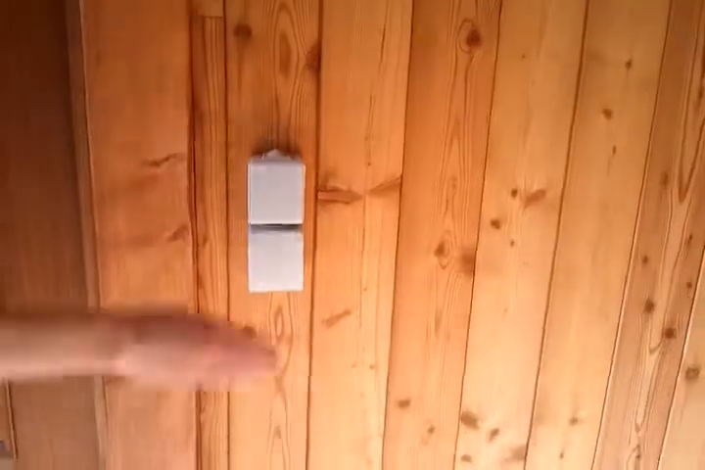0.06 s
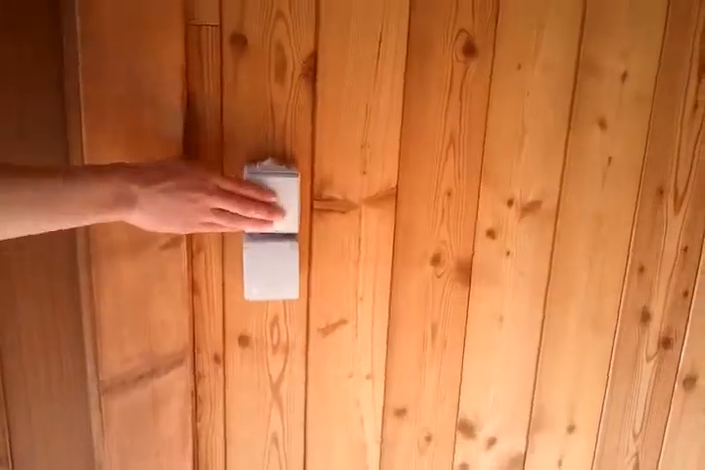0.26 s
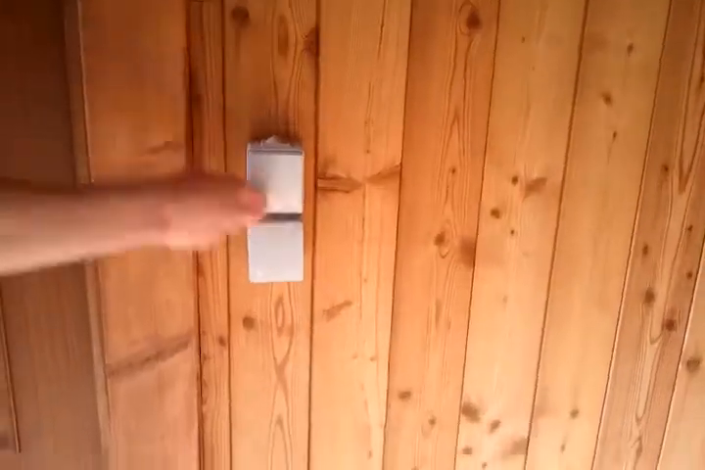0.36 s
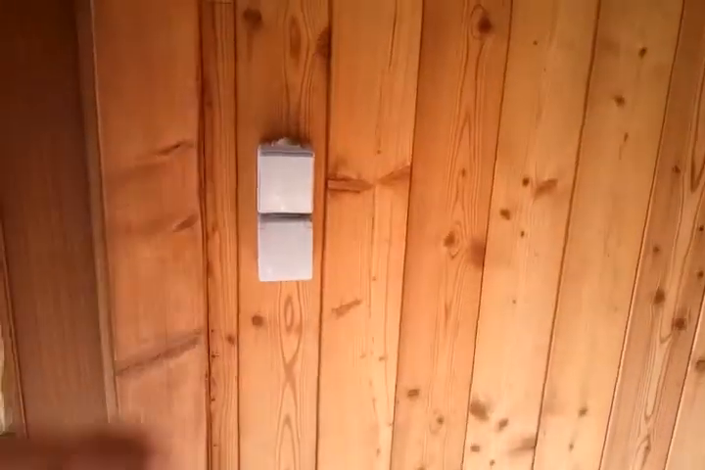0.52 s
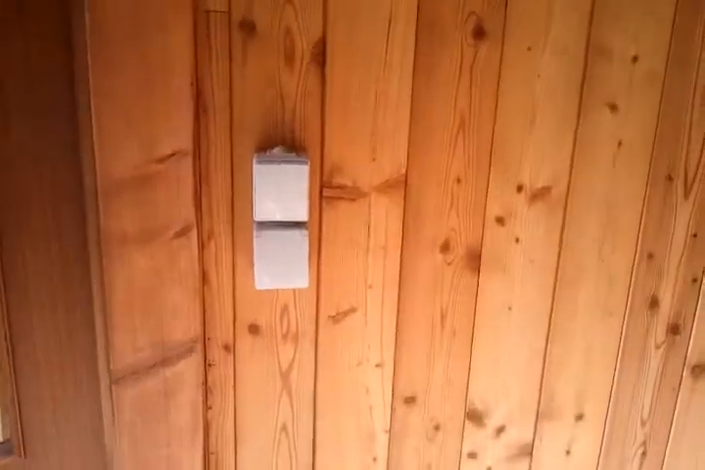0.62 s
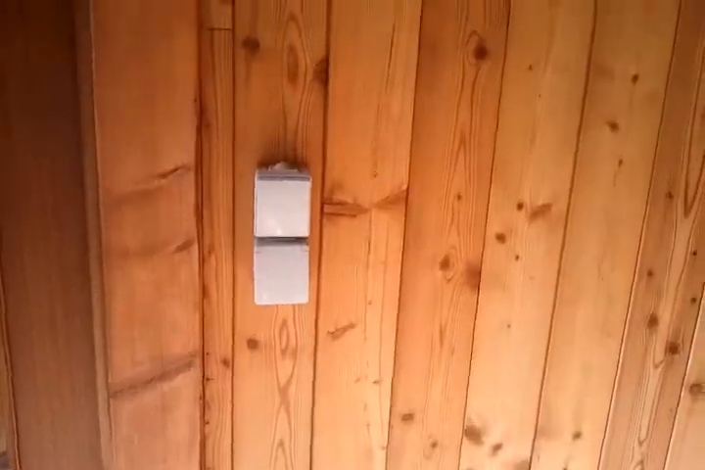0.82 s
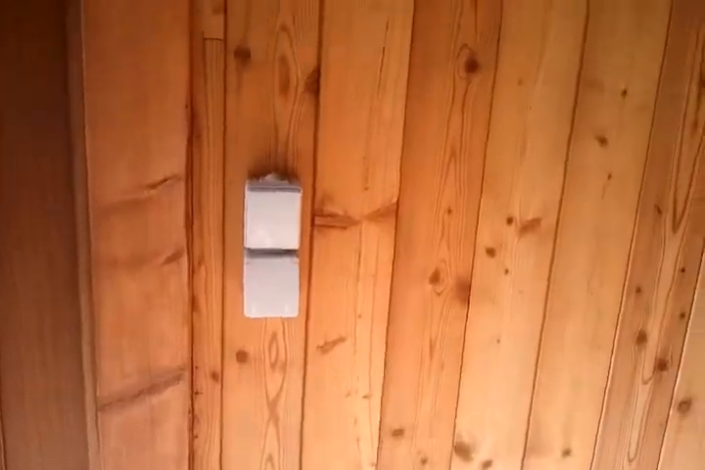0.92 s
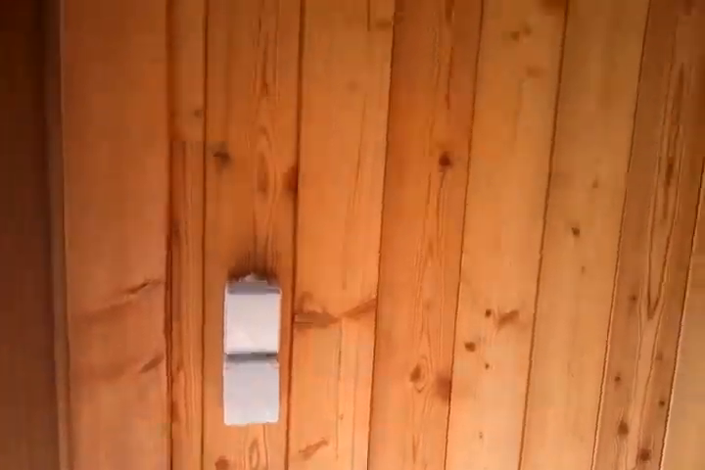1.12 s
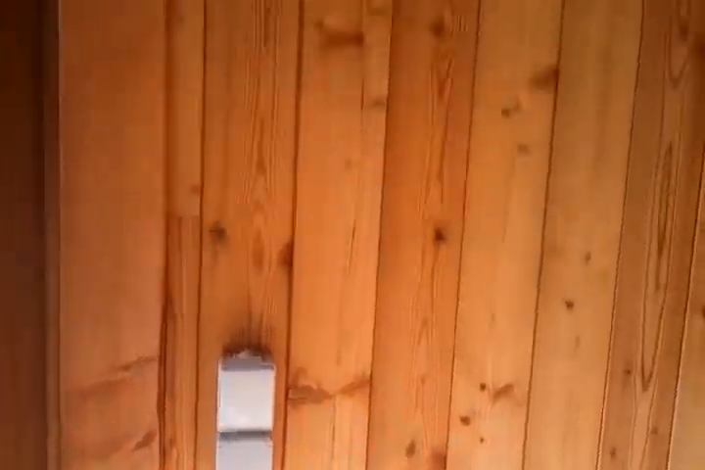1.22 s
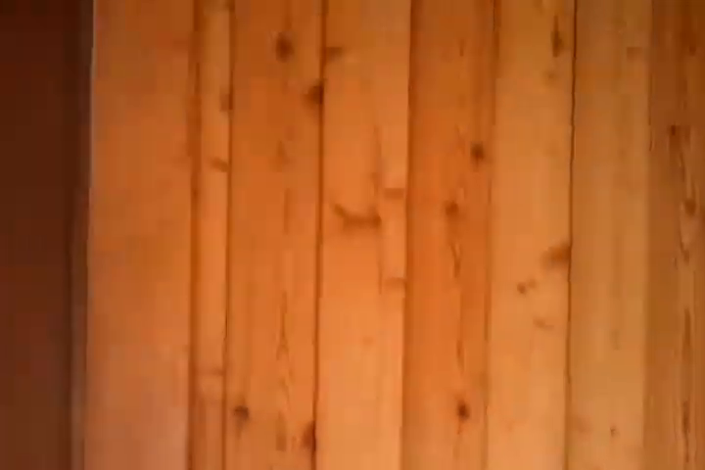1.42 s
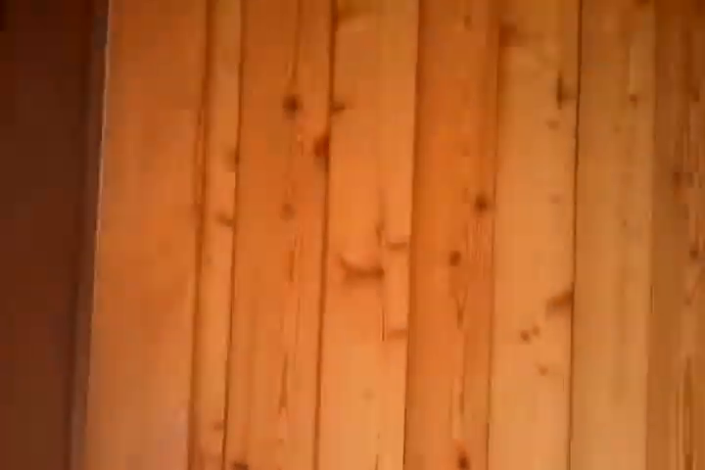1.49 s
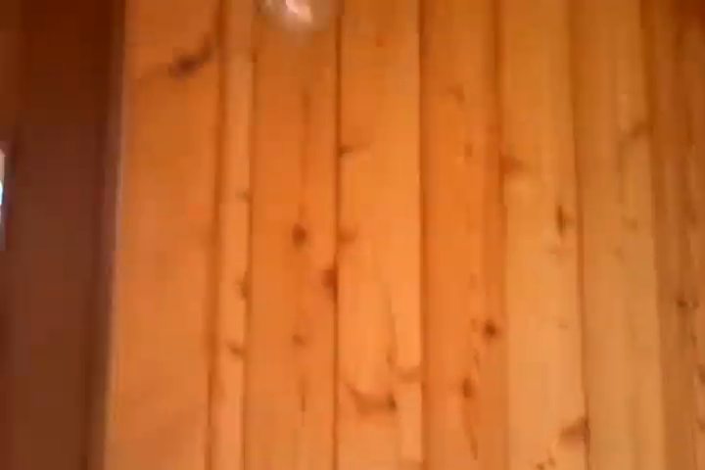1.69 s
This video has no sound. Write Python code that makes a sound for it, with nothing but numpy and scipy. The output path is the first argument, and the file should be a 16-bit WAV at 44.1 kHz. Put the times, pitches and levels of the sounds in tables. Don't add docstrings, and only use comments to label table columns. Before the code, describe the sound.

A plastic rocker switch on a wooden wall snaps once, loud and close, with a tiny rattle and short room reflection; afterwards soft cloth rustles and handling bumps, with faint birds outside, on a hand-held phone.

```python
import sys
import numpy as np
from scipy import signal
from scipy.fft import rfft, irfft, next_fast_len
from scipy.io import wavfile
from scipy.ndimage import uniform_filter1d, map_coordinates

SR = 44100
rng = np.random.default_rng(int(sys.argv[2]) if len(sys.argv) > 2 else 0)


def digitize_waveform(pressure):
    field = np.atleast_2d(pressure).T
    bounded = np.clip(field, -1, 1)
    quanta = np.round(bounded * 32767).astype(np.int16)
    wavfile.write(sys.argv[1], SR, quanta)


def nominal_scale(level):
    x = np.asarray(level, float) / 20
    return 10 ** x


N = 77175

# (frequency [Hz], level [dB])
AIR_COLOUR = [(76, -31), (130, -15), (250, -10), (858, -15.5), (1590, -17.5), (3520, -10), (4550, -14.5),
              (12500, -25.5), (15000, -21.5)]
# (frequency [Hz], level [dB rms])
HUM_TONES = [(50, -60), (100, -63), (305, -79)]
# (frequency [Hz], level [dB])
RUMBLE_COLOUR = [(8.8, 0), (15, 5), (56, -4), (183, -21), (321, -38), (400, -24.5), (520, -54), (880, -120)]
# (time [s], level [dB])
RUMBLE_LEVEL = [(0, -63.5), (.15, -54.5), (.232, -35), (.33, -41), (.5, -49.5), (.55, -48.5), (.62, -60.5),
                (.66, -48.5), (.83, -50), (.86, -58.5), (1.1, -56.5), (1.16, -57), (1.75, -57)]
# (time [s], attack [s], hold [s], release t60 [s], level [dB])
GRIP_SHIFTS = [
    (.42, .015, .02, .06, -60),
    (.525, .01, .012, .04, -51),
    (.67, .02, .07, .1, -53),
    (.78, .008, .03, .08, -51),
    (1.15, .01, .02, .08, -56),
]
# (frequency [Hz], level [dB])
GRIP_COLOUR = [(40, -10.5), (90, 9.5), (200, -7.5), (350, -10.5), (700, -21), (1500, -120)]
# (time [s], level [dB], width [s], sign [-1 to 1])
CASE_CREAKS = [
    (0.1857, -19, 0.00019, -0.76),
    (0.31, -22, 0.0027, 0.95),
    (0.363, -28, 0.000067, 0.46),
    (0.542, -30, 0.0041, 0.46),
    (1.512, -40, 0.000044, 1),
    (1.6644, -21.5, 0.0001, 0.74),
]

# (frequency [Hz], width [Hz], level [dB])
FLOCK_PEAKS = [(2696, 820, 0.5), (3300, 1600, -13.5), (4880, 310, -2.5), (6900, 560, -4.5),
               (7400, 1500, -10.5)]
# (time [s], level [dB])
FLOCK_LEVEL = [(0, -68), (.3, -67), (.62, -64.5), (.9, -60), (1.2, -65), (1.35, -56), (1.6, -63.5),
               (1.75, -66)]
# (time [s], length [s], start [Hz], end [Hz])
RISING_WHISTLES = [(.012, .066, 3200, 5250), (.024, .06, 3100, 4750), (.036, .05, 3000, 4200),
                   (.646, .09, 4550, 5300), (.632, .105, 4550, 5600), (.895, .04, 2450, 2800),
                   (1.52, .05, 5200, 5600), (1.575, .03, 5550, 5600)]
RISING_DB = [-59, -60, -60.5, -58, -48.5, -58.5, -59.5, -63]
# (time [s], length [s], start [Hz], end [Hz])
UPWARD_SWEEPS = [(.115, .025, 2600, 3300), (.33, .05, 2600, 3400), (.46, .032, 2800, 4000),
                 (.515, .02, 3500, 6500), (.565, .034, 2800, 4000), (.975, .078, 3150, 4450),
                 (1.48, .065, 2900, 3550), (1.595, .028, 2800, 5200)]
UPWARD_DB = [-56, -68, -57.5, -55, -57, -53.5, -66, -54]
# (time [s], length [s], start [Hz], end [Hz])
FALLING_CHIRPS = [(.115, .03, 8000, 7300), (.11, .028, 6200, 5700), (.175, .035, 7100, 6600),
                  (.175, .035, 6000, 5500), (.395, .045, 8000, 7650), (.38, .04, 6300, 5900),
                  (.39, .015, 3300, 3200), (.535, .06, 8300, 7600), (.535, .05, 6300, 5900),
                  (.705, .04, 6600, 5900), (.735, .04, 8100, 7650), (1.105, .04, 7200, 7100),
                  (1.105, .025, 6400, 5950), (1.295, .03, 4000, 3300), (1.53, .04, 6300, 6200),
                  (1.635, .06, 6300, 5700), (1.645, .04, 7400, 7200), (1.64, .03, 6900, 6700),
                  (1.69, .035, 3400, 3100), (.46, .04, 6550, 6300), (.5, .025, 7600, 7500),
                  (.525, .03, 7900, 7000), (1.54, .05, 6950, 6850), (.71, .035, 8500, 8200),
                  (1.635, .05, 8000, 7800)]
FALLING_DB = [-54, -60, -48.5, -55.5, -54.5, -71, -57, -57, -66, -71, -59.5, -55, -61, -62, -62.5, -58,
              -58.5, -59, -55, -66, -69, -66, -68.5, -67, -82]
STRAIGHT_DB = [0, -2, -1]
REFLECTED_DB = [1, 0, -5]
# (time [s], attack [s], hold [s], release t60 [s], level [dB])
TWITTER_STROKES = [(.08, .03, 0.031, 0.3, -59), (.17, 0.014, 0.035, 0.12, -55),
                   (.37, 0.008, 0.022, .2, -57.5), (.41, 0.009, 0.016, .08, -63),
                   (.515, 0.0086, 0.016, 0.24, -64.5), (.69, 0.012, .05, 0.21, -60.5),
                   (1.52, .02, 0.033, .2, -74), (1.62, 0.012, 0.066, 0.31, -61.5),
                   (1.735, .008, 0.006, .05, -70)]
# (frequency [Hz], level [dB])
TWITTER_COLOUR = [(3000, -44), (5000, -6), (6200, -5), (7600, -5.5), (8600, -12.5), (10000, -21),
                  (13000, -68)]

# (time [s], attack [s], hold [s], release t60 [s], level [dB])
CLOTH_STROKES = [
    (0.354, 0.013, 0.012, 0.38, -56),
    (0.517, 0.0037, 0.0089, 0.16, -69),
    (0.775, 0.0098, 0.017, 0.28, -45),
    (1.11, 0.031, 0.046, 0.65, -58),
    (1.197, 0.08, 0.077, 0.25, -51),
    (1.399, 0.032, 0.013, 0.076, -56.5),
]
# (frequency [Hz], level [dB])
CLOTH_COLOUR = [(88, -41), (150, -31), (1570, -10), (2750, 4), (4810, -6.5), (5950, -12), (7080, -8),
                (11900, -14), (15000, -19)]
# (time [s], attack [s], hold [s], release t60 [s], level [dB])
CLOTH_SCUFFS = [
    (.385, 0.0056, 0.011, 0.11, -51.5),
    (.78, 0.0065, 0.019, 0.1, -52.5),
    (1.15, 0.0033, 0.022, 0.12, -53.5),
    (1.695, 0.0035, 0.013, 0.036, -64),
]
# (frequency [Hz], level [dB])
SCUFF_COLOUR = [(90, -31), (200, 1), (650, -5), (2340, -2), (3800, -4), (7000, -14), (12000, -120)]

# (time [s], softness [s])
CONTACT_BLOWS = [(.2064, .00005), (.2077, .00005), (.2090, .00006), (.2105, .00012), (.2134, .00002),
                 (.2139, .00004), (.2148, .00003), (.2157, .00005), (.2171, .00004), (.2201, .00003),
                 (.2222, .00003), (.2244, .00003)]
BLOW_DB = [-24, -21.5, -35.5, -17.5, -19.5, -6, -13, -5, -11, -11.5, -17.5, -12.5]
# (frequency [Hz], width [Hz], level [dB])
PLATE_PEAKS = [(338, 41, -5.5), (450, 49, -11), (764, 58, -2.5), (1414, 260, -4), (2154, 730, -1),
               (2587, 146, 6), (3075, 104, -2), (4360, 480, -12.5), (6170, 330, -8.5), (8730, 516, -3),
               (11980, 1500, -7.5), (116, 86, -16.5)]
# (frequency [Hz], level [dB])
RATTLE_COLOUR = [(1500, -60), (3000, -6), (4500, 0), (8500, 0), (13500, -6), (15000, -16)]
# (frequency [Hz], t60 [s])
ROOM_DECAY = [(150, 0.25), (500, 0.28), (2000, 0.2), (5000, 0.25), (12000, 0.18)]
# (frequency [Hz], level [dB])
ROOM_COLOUR = [(200, 3), (2000, -2.5), (4000, -6), (13000, -4.5)]


def unit(x):
    return x / np.sqrt(np.mean(x ** 2) + 1e-20)


def along(points, hz):
    f, v = np.transpose(points)
    return np.interp(np.log(hz + 1), np.log(f + 1), v)


def colour_gain(points):
    return lambda f: nominal_scale(along(points, f))


def curve(rows):
    s, v = np.transpose(rows)
    return np.interp(np.arange(N) / SR, s, v)


def wobble(rate):
    knots = rng.standard_normal(int(N * rate / SR) + 4)
    return map_coordinates(knots, [np.arange(N) * rate / SR])


def filtered(x, response):
    m = next_fast_len(len(x) + SR // 2)
    return irfft(rfft(x, m) * response(np.fft.rfftfreq(m, 1 / SR)), m)[:len(x)]


def resonant(peaks):
    def response(f):
        return sum((-1) ** k * nominal_scale(db) * 1j * f * width / (hz * hz - f * f + 1j * f * width)
                   for k, (hz, width, db) in enumerate(peaks))
    return response


def rush(response, patchy_db):
    z = signal.stft(rng.standard_normal(N), nperseg=512)[2]
    field = uniform_filter1d(rng.standard_normal(z.shape), size=4, axis=0)
    field = uniform_filter1d(field, size=8, axis=1)
    noise = signal.istft(z * nominal_scale(patchy_db * unit(field)), nperseg=512)[1][:N]
    return unit(filtered(noise, response))


def friction(strokes, colour):
    t = np.arange(N) / SR
    shape = np.zeros(N)
    for start, attack, hold, t60, db in strokes:
        release = nominal_scale(db - 60 * np.clip(t - start - attack - hold, 0, 9) / t60)
        shape += release * np.clip((t - start) / attack, 0, 1)
    grain = nominal_scale(0.87 * wobble(550))
    return shape * unit(grain * rush(colour_gain(colour), patchy_db=2.0))


def echo(x, decays):
    hz, t, z = signal.stft(rng.standard_normal(SR // 2), SR, nperseg=128)
    tail = signal.istft(z * nominal_scale(-60 * t / along(decays, hz)[:, None]), SR, nperseg=128)[1]
    return signal.fftconvolve(x, tail / np.linalg.norm(tail))[:N]


def room_air():
    return nominal_scale(-62.5) * rush(colour_gain(AIR_COLOUR), patchy_db=1.5)


def mains_hum():
    t = np.arange(N) / SR
    return sum(nominal_scale(db + 3.0 + 2.9 * wobble(6.77)) * np.sin(2 * np.pi * hz * t) for hz, db in HUM_TONES)


def grip_rumble():
    unsteady = nominal_scale(2 * wobble(25))
    return nominal_scale(curve(RUMBLE_LEVEL)) * unit(unsteady * rush(colour_gain(RUMBLE_COLOUR), patchy_db=0))


def case_creaks():
    case_hz = 87
    t = np.arange(N) / SR
    pushes = sum(sign * nominal_scale(db) * np.exp(-np.abs(t - s) / width) for s, db, width, sign in CASE_CREAKS)
    return filtered(pushes, lambda f: 1j * f / (case_hz + 1j * f))


def handling():
    return grip_rumble() + case_creaks() + friction(GRIP_SHIFTS, GRIP_COLOUR)


def far_flock():
    noise = rush(lambda f: np.abs(resonant(FLOCK_PEAKS)(f)) ** 2, patchy_db=-6)
    return noise * nominal_scale(curve(FLOCK_LEVEL) + 2.5)


def whistles():
    swell = .4
    hoarse = .5
    flutter, warble_hz = nominal_scale(1.2 * wobble(150)), 15 * wobble(280)
    kinds = [(RISING_WHISTLES, RISING_DB, 4), (UPWARD_SWEEPS, UPWARD_DB, 1), (FALLING_CHIRPS, FALLING_DB, 1.4)]
    out = np.zeros((3, N + SR))
    for row, (calls, levels, bend) in zip(out, kinds):
        for (s, length, start_hz, end_hz), db in zip(calls, levels):
            first = round(s * SR)
            u = np.linspace(0, 1, round(length * SR))
            glide = end_hz + (start_hz - end_hz) * (1 - u) ** bend
            hz = glide + warble_hz[first:][:len(u)]
            tone = np.sin(2 * np.pi * np.cumsum(hz) / SR)
            row[first:][:len(u)] += nominal_scale(db + 2) * np.sin(np.pi * u) ** swell * tone
    scatter = [np.ones(N), unit(1 + hoarse * wobble(900)), unit(1 + hoarse * wobble(400))]
    return out[:, :N] * flutter * scatter


def birds():
    songs = whistles()
    straight = nominal_scale(STRAIGHT_DB) @ songs
    reflected = nominal_scale(REFLECTED_DB) @ songs
    walls = echo(reflected, [(3000, .14)])
    yard = nominal_scale(-11) * echo(reflected, [(3000, .6)])
    return straight + walls + yard + far_flock() + friction(TWITTER_STROKES, TWITTER_COLOUR)


def cloth():
    return friction(CLOTH_STROKES, CLOTH_COLOUR) + friction(CLOTH_SCUFFS, SCUFF_COLOUR)


def contact_ring():
    t = np.arange(N) / SR
    blows = sum(nominal_scale(db) * np.exp(-((t - s) / soft) ** 2) / (soft * SR)
                for (s, soft), db in zip(CONTACT_BLOWS, BLOW_DB))
    plate = resonant(PLATE_PEAKS)
    single_click = filtered(np.eye(1, 4096)[0], plate)
    return filtered(blows, plate) / np.abs(single_click).max()


def rattle():
    start_s, level_db, t60_s = .2136, -24, 0.073
    t = np.arange(N) / SR - start_s
    decay = (t > 0) * nominal_scale(level_db - 60 * np.abs(t) / t60_s)
    return rush(colour_gain(RATTLE_COLOUR), patchy_db=1.0) * decay


def switch():
    room_db, room_delay_s = -3.5, 0.0037
    near = contact_ring() + rattle()
    late = np.roll(filtered(near, colour_gain(ROOM_COLOUR)), round(room_delay_s * SR))
    return near + nominal_scale(room_db) * echo(late, ROOM_DECAY)


def scene():
    return (room_air() + mains_hum() + handling() + birds() + cloth() + switch())[None]


def top_cut(x):
    return signal.sosfilt(signal.butter(12, 15430, fs=SR, output="sos"), x)


def record(dry):
    peak_top, top_hz = .8, 14800
    limited = dry[0] / (1 + np.abs(dry[0] / peak_top) ** 4) ** (1 / 4)
    mix = filtered(limited, lambda f: f < top_hz)[None]
    return top_cut(mix)


dry = scene()
out = record(dry)
digitize_waveform(out)
```